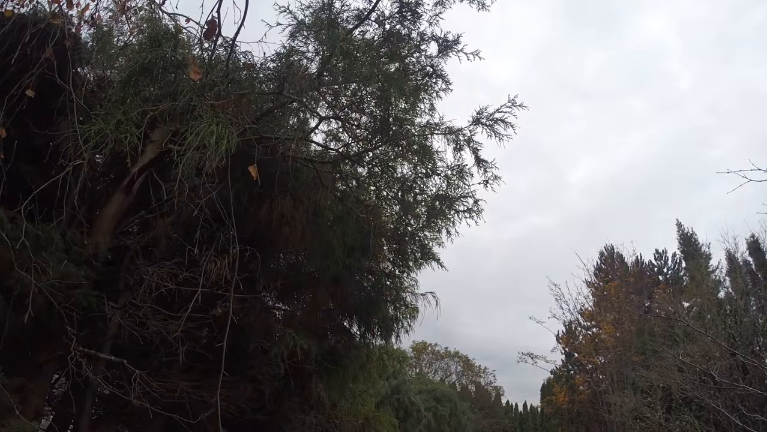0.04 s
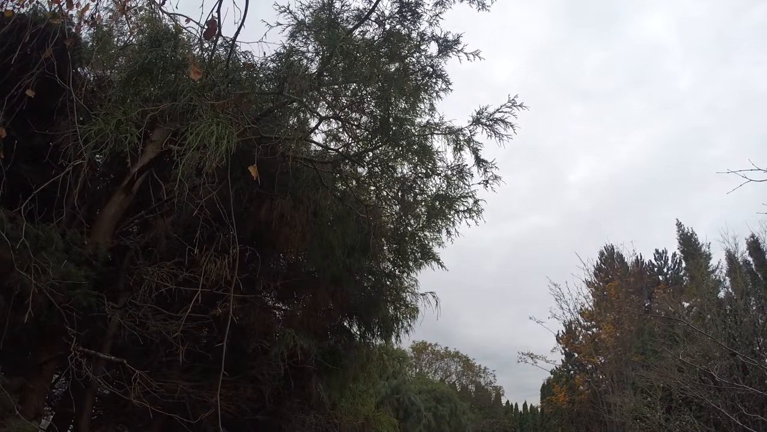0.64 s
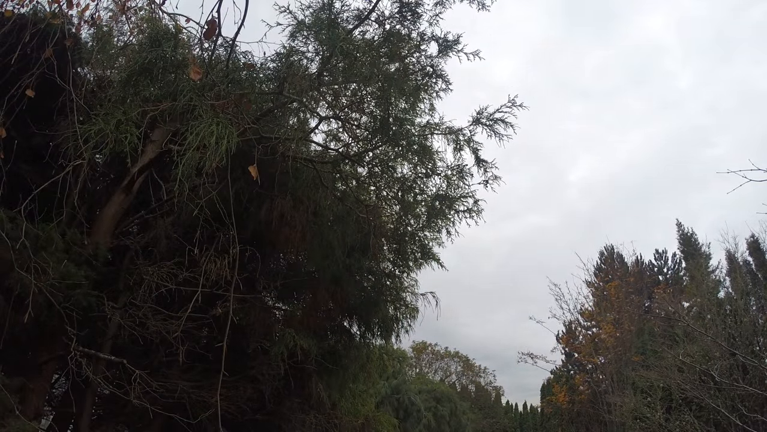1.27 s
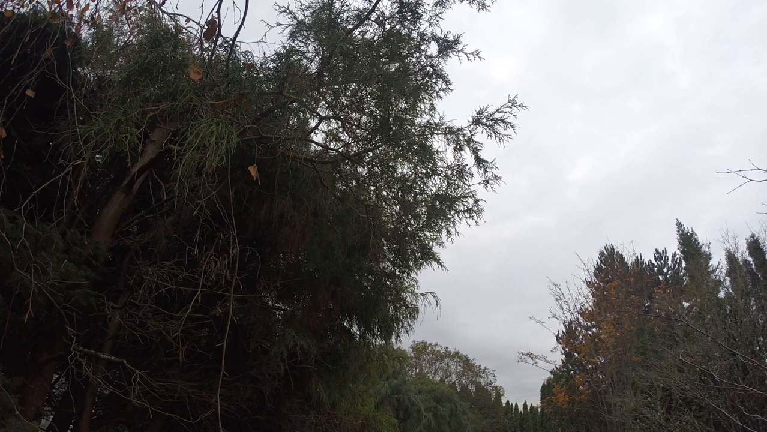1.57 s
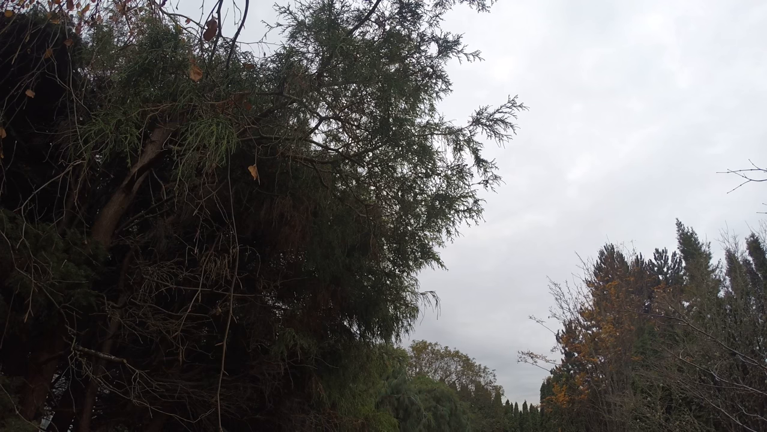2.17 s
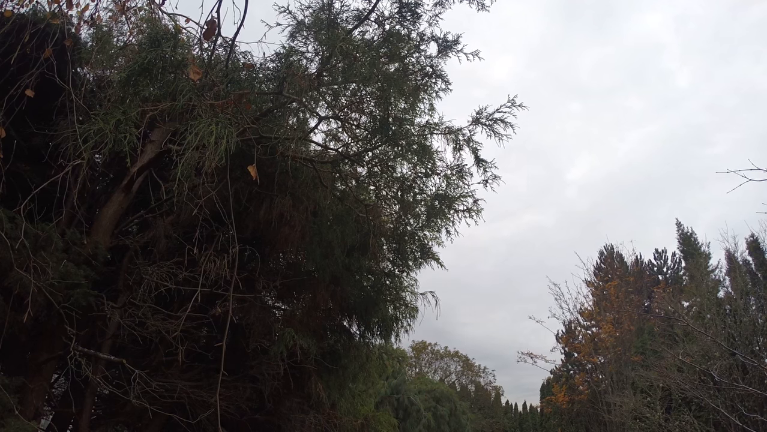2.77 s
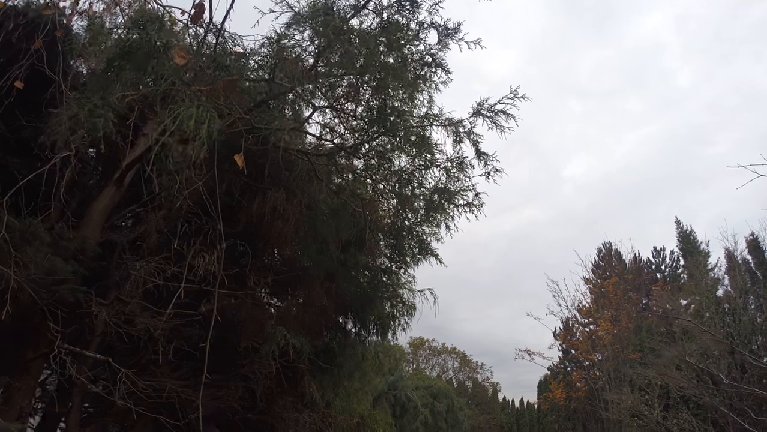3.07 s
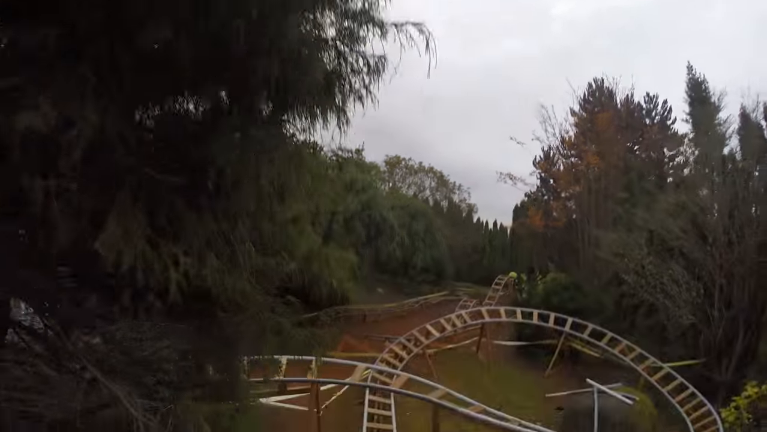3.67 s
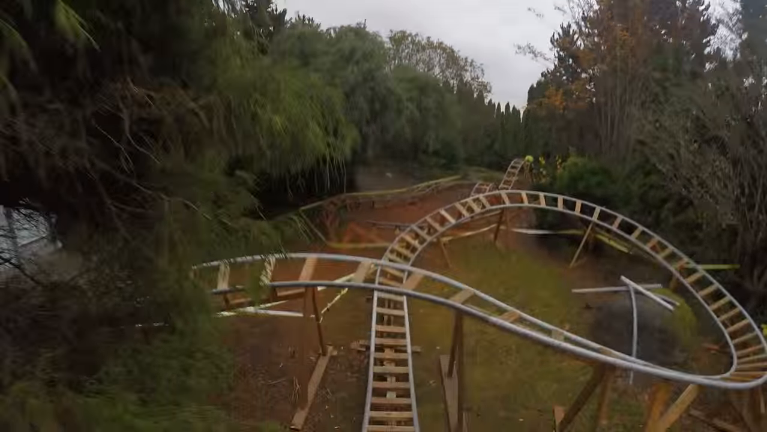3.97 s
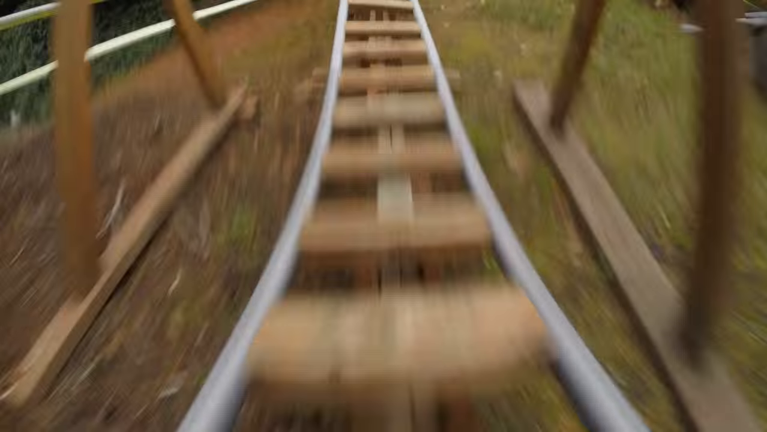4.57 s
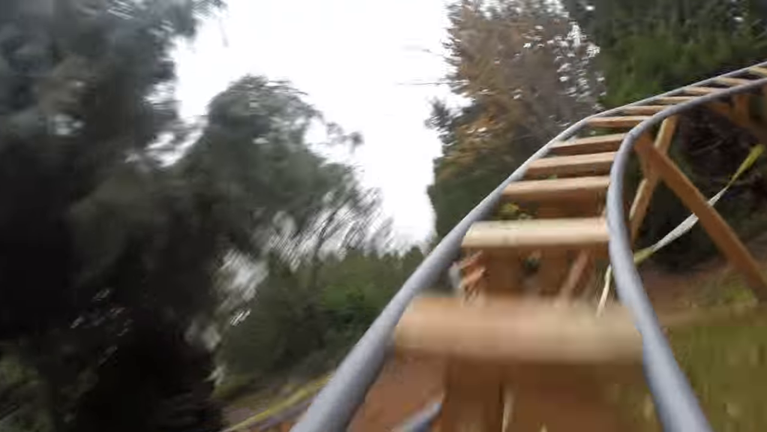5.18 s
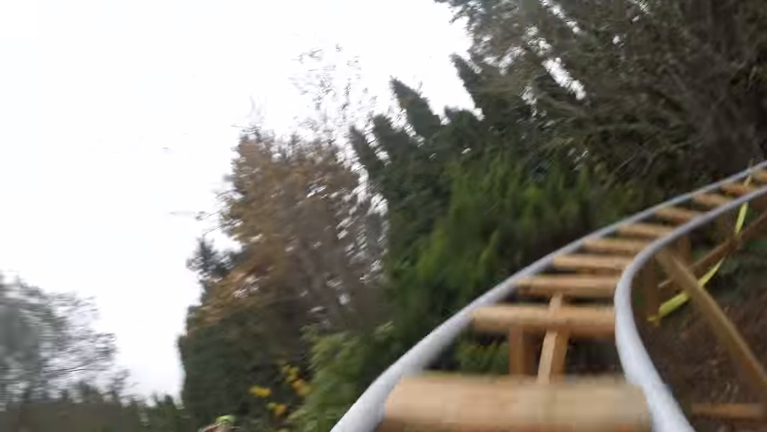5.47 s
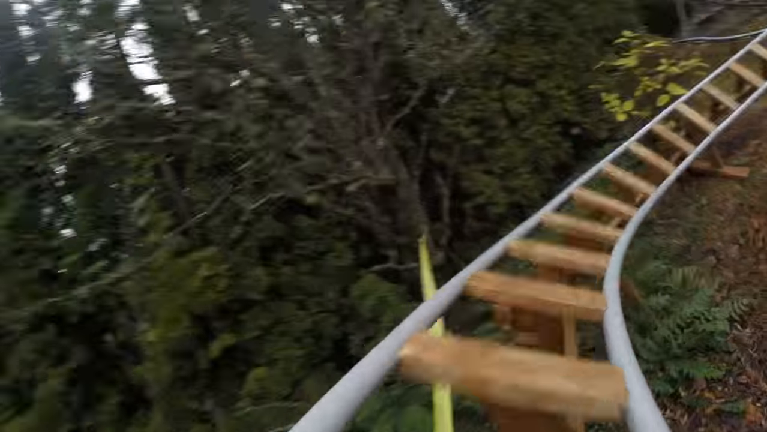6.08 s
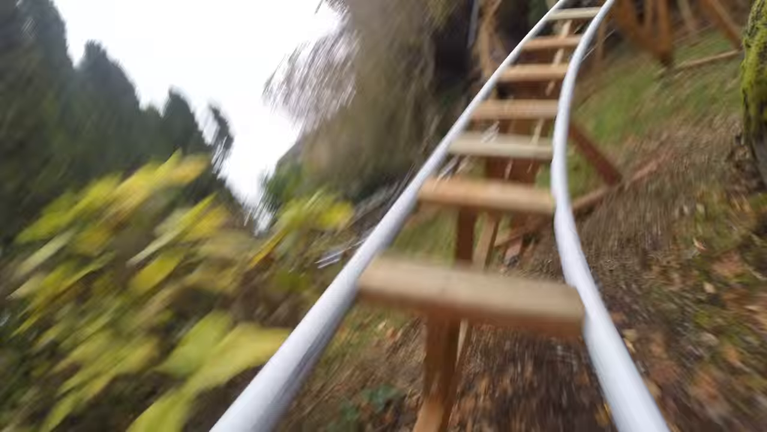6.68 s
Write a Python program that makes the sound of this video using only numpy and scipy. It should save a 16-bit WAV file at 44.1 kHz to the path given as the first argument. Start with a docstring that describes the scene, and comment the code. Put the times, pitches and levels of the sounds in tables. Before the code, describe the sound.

Outdoors in a garden, a faint distant rumble and a soft rustle are heard while a small coaster car waits. The car gives several hollow knocks, creeps forward, then runs downhill. Its hard wheels grind loudly on steel rails over wooden ties, with booming, rattling and sharp clacks from loose joints. The rolling swells and drops as the car rocks, all close to an on-board microphone.

```python
"""A garden coaster track, heard from a small car: it knocks at the top, creeps off, runs downhill.
Hard wheels grind on steel tube rails over wooden ties; the flaws they strike keep the steel ringing.
The frame booms, jolts and clacks in its loose joints. The car rocks, so the rolling swells and drops.
The moving car rumbles deeply; in the dip the wheels groan and two low gusts pass.
A distant rumble lies under it all. The on-board camera's limiter catches the loudest clacks."""
import sys
import numpy as np
from scipy import signal
from scipy.fft import rfft, irfft, next_fast_len
from scipy.io import wavfile
from scipy.ndimage import uniform_filter1d, map_coordinates

SR = 44100
rng = np.random.default_rng(int(sys.argv[2]) if len(sys.argv) > 2 else 0)


def unload_audio(sound):
    """Save the sound as a 16-bit wav file, at the path given as the first command line argument."""
    columns = np.transpose(np.atleast_2d(sound))
    # keep every value between -1 and 1, then stretch to whole-number steps
    steps = np.round(np.clip(columns, -1, 1) * 32767)
    wavfile.write(sys.argv[1], SR, steps.astype(np.int16))


N = 301644

# Noise spectra: freq_hz, density_db
GARDEN_SPECTRUM = [(12, -44), (20, -8.5), (92, 0), (149, -10), (242, -8), (532, -18.5), (718, -14),
                   (1440, -26.5), (1940, -30.5), (2130, -32.5), (3450, -35), (5000, -42.5), (6500, -63),
                   (11000, -120)]  # distant rumble
HISS_SPECTRUM = [(500, -25), (3000, 0), (6000, 3), (9000, -4), (14000, -4.5), (15500, -3)]  # camera electronics
CLATTER_SPECTRUM = [(88, -15), (150, -7), (239, -19), (462, -4), (595, -5), (1290, -1.5), (1420, -12),
                    (1600, 2.5), (2810, -5.5), (4220, -7.5), (5030, -5.5), (6110, -10.5), (6730, -22.5),
                    (13500, -36.5), (15500, -66)]  # chattering parts
RUSTLE_SPECTRUM = [(60, -11), (200, 3), (450, -3), (1200, -10), (2000, -17), (3800, -25), (6000, -21),
                   (9000, -30), (15000, -40)]  # soft rustle
WHISPER_SPECTRUM = [(100, 6.5), (350, 5.5), (800, 7), (1400, 0), (2000, -2), (4200, -10.5), (6000, -3.5),
                    (9000, -11), (13000, -18), (15500, -16)]  # creeping wheels
CAR_RUMBLE_SPECTRUM = [(15, 3.5), (35, -6), (75, -6), (130, -19), (400, -81), (2000, -94)]  # deep rumble of the moving car, low gusts
ROAR_SPECTRUM = [(60, -11.5), (170, -7.5), (270, -7), (450, 2), (750, -0.5), (1100, -4.5), (1700, -7.5),
                 (3000, -25.5), (6000, -29), (15000, -102.5)]  # rolling, dull part
GRIT_SPECTRUM = [(300, -6.5), (1000, -14), (1900, 11), (2700, 0.5), (4100, -6.5), (5100, -2.5),
                 (6200, -9.5), (7800, -21), (10000, -44), (15500, -58)]  # rolling, bright part
FIZZ_SPECTRUM = [(2000, -29), (6000, 12.5), (9000, -8.5), (13300, -1), (15500, -11)]  # hard-pressed wheels
CRACK_SPECTRUM = [(150, -17), (700, 9), (3000, 11), (6000, -1), (8000, -14.5), (11000, -17), (15500, -47)]  # joint impact
GROAN_SPECTRUM = [(200, -26.5), (400, -5), (520, -10.5), (700, -2), (1100, -0.5), (1500, -10),
                  (3000, -28.5), (8000, -70)]  # wheels in the dip

# Blows on the car: start_s, level_db, thump_db, treble_db, clatter_t60_s, low_mid_db, hollow_hz
KNOCK_HITS = [(0.198, -37.5, -13, -33, 0.03, 11, 1010), (1.586, -31.5, -14, -25, 0.06, 3, 1090),
              (2.104, -30, -15, -17, 0.06, 4, 3450), (2.153, 2, -23, -11, 0.065, -7, 1130),
              (2.213, -20.5, -17, -16, 0.088, -9, 3330), (2.378, 5.5, -19.5, -9.5, 0.088, 3, 925),
              (2.394, 3, -26, -9, 0.056, 6.5, 2320), (2.67, -9.5, -12, -14.5, 0.073, 11, 690),
              (2.951, -21, -11.5, -49, 0.065, 7, 1840), (3.211, 7.5, -24, -9, 0.071, 8, 453),
              (3.225, 1, -18, -2, 0.087, -17, 2700)]
# Frame modes, the second its bounce on the wheels: freq_hz, level_db, t60_s
FRAME_MODES = [(28.1, -13, 1.655), (118.5, -2.5, 0.24), (490, -5.5, 0.23), (956, -12, 0.13),
               (1900, -11, 0.17), (4500, -29, 0.21)]
# Chassis resonances: freq_hz, width_hz, lift_db
CHASSIS_RESONANCES = [(464, 52, -1.5), (674, 66, 6.5), (950, 250, 2), (1310, 23, -1.5), (1890, 160, -1),
                      (2813, 420, 6), (3538, 370, 6.5), (4923, 66, 10.5), (6100, 490, 5.5), (7370, 340, 11)]
# Slow creep of the wheels: time_s, level_db
CREEP_LEVELS = [(0, -88), (2.0, -83), (2.45, -52.5), (2.86, -45), (2.97, -47.5), (3.06, -44.5), (3.2, -41),
                (3.3, -55), (3.4, -71)]
# Short gritty scrapes, and the soft first contact of the 3.21 s knock:
# centre_s, level_db, half_length_s, centre_hz
SCRAPES_AND_CONTACT = [(2.324, -33.5, 0.037, 1890), (2.641, -32.5, 0.017, 1010), (2.67, -29.5, 0.016, 1290),
                       (3.209, -14, 0.0023, 607), (3.249, -21.5, 0.02, 2530), (3.37, -45, 0.061, 1775)]
# Frame bounce over the crest: time_s, level_db
CREST_LEVELS = [(2.8, -51.5), (3.08, -37.5), (3.37, -28.5), (3.44, -17), (3.69, -19), (3.77, -26.5),
                (4.2, -33), (4.6, -49)]
# Low gusts at the bottom of the dip: centre_s, level_db
DIP_GUSTS = [(4.809, -23), (5.04, -29)]
# Rolling, growing with speed and load: time_s, roar_db, grit_db
ROLL_LEVELS = [(3.3, -38, -76), (3.39, -36.5, -57), (3.44, -27.5, -23), (3.56, -24.5, -23.5),
               (3.66, -19.5, -18), (3.85, -24, -30), (4.2, -27, -32), (4.5, -28, -24), (4.8, -21, -23.5),
               (5.05, -25.5, -20), (5.38, -22.5, -25.5), (5.78, -29.5, -28), (5.95, -24.5, -23),
               (6.2, -26.5, -27.5), (6.58, -23, -23.5), (6.84, -26, -31.5)]
# Rocking; the wheels press, lift, run light: lift_s, drop_db, light_for_s
WHEEL_LIFTS = [(3.743, 6, 0.069), (4.035, 4.5, 0.052), (4.314, 6.5, 0.051), (4.525, 0, 0.076),
               (4.954, 0.5, 0.023), (5.12, 4.5, 0.14), (5.579, 3, 0.086), (5.69, -2, 0.021),
               (6.295, 2.5, 0.025), (6.697, 8.5, 0.036)]
# Modes of wheels and steel tube: freq_hz, width_hz, level_db
STEEL_MODES = [(601, 15, 3), (1627, 10, -26), (2300, 17, 3), (2384, 67, 7.5), (2836, 98, 5),
               (4860, 200, 6.5), (5034, 62, 1.5), (5960, 53, -4), (7330, 40, -16), (8690, 35, -14),
               (10300, 37, -14.5), (11750, 75, -17), (13250, 160, -25)]
# Wheels hitting uneven rail: start_s, level_db, treble_db, clatter_t60_s
RAIL_JOLTS = [(3.621, -5.5, -5, .06), (3.7, -5, -4, .035), (3.831, -9.5, -5, .025),
              (3.857, -12.5, 6, 0.096), (4.002, 1, -3, 0.076), (4.085, -6, 5, .045), (4.127, -8, 11, 0.042),
              (4.362, -9.5, -6, 0.074), (4.421, 2, 0, 0.07), (4.448, -1, -12, 0.035),
              (4.494, 2.5, -13, 0.072), (4.644, -4, -2.5, 0.077), (4.71, -6, -11, 0.05),
              (4.797, 0.5, -17, 0.02), (4.912, -1.5, -3, 0.07), (4.939, -1.5, 12, 0.043),
              (4.998, -7, -11, 0.049), (5.039, -8.5, -4, 0.037), (5.082, -5, -4, .15),
              (5.376, -4.5, 1, .027), (5.659, -6.5, 0, .067), (5.767, -8, -2, 0.033),
              (5.967, -5.5, 5, 0.073)]
# A loose joint striking its stop: start_s, clack_db, ping_db
JOINT_HITS = [(4.4721, 13, 2), (4.514, 13, 3.5), (4.527, 7, -14), (4.559, 9, 0), (4.573, 4.5, -9),
              (4.587, 1, -22), (4.606, 9, -7), (4.6963, 2.5, -25), (5.114, -9, 2), (5.1164, 7, 9),
              (5.2006, 13.5, 4), (5.212, -5, 2.5), (5.3183, 8.5, -4.5), (5.353, 0, 7.5), (5.463, -1.5, -23),
              (5.5736, 15.5, 2), (5.6816, 1, 12), (5.8747, -8, 2), (5.8884, 1.5, -1), (6.0389, 9.5, 6.5),
              (6.0978, 1, 9.5), (6.2103, -22, -3.5), (6.249, -18, 8.5), (6.254, -18, 5), (6.2865, -24, 5),
              (6.4143, -7, -5.5), (6.4314, 3.5, -3), (6.465, -14, -4.5), (6.474, -19, -6),
              (6.4922, -21, 2.5), (6.508, -18, 2), (6.5132, -18, -3.5), (6.5321, -6, -0.5),
              (6.5408, -9, -2), (6.5742, 7, -27), (6.6473, -2.5, -4), (6.677, -12, 11), (6.6845, -20, 7),
              (6.6875, -14, 11.5), (6.7327, 1.5, -5.5)]
# Resonances of the groan: freq_hz, width_hz, lift_db
GROAN_RESONANCES = [(704, 80, 7), (953, 110, 6)]

CRUISE_DB = -22.5  # roar and grit at cruising load
TIME_S = np.arange(N) / SR


def amp(db):
    """Decibels to gain."""
    return 10 ** (np.asarray(db) / 20)


def unit(x):
    """x at rms 1."""
    return x / np.sqrt(np.mean(x ** 2) + 1e-20)


def noise(count=N):
    """White noise."""
    return rng.standard_normal(count)


def impulses(rate_hz):
    """Randomly timed impulses of random size."""
    return (rng.random(N) < rate_hz / SR) * noise()


def along(points, hz):
    """Interpolate (freq_hz, value) points on a log axis."""
    freqs_hz, values = np.transpose(points)
    return np.interp(np.log(hz + 1), np.log(freqs_hz + 1), values)


def levels(rows):
    """A gain curve per dB column, fading in over 81 ms before the first row."""
    times_s, *columns_db = np.transpose(rows)
    fade_in = np.clip(1 + (TIME_S - times_s[0]) / 0.081, 0, 1)
    return [amp(np.interp(TIME_S, times_s, db)) * fade_in for db in columns_db]


def swell(full_s, rise_s, hold_s, fall_s):
    """Trapezoid, 0 to 1 and back; reaches 1 at full_s."""
    t = TIME_S - full_s
    return np.clip(np.minimum(1 + t / rise_s, 1 - (t - hold_s) / fall_s), 0, 1)


def wobble(rate_hz):
    """Smooth random curve, rms near 1."""
    return map_coordinates(noise(int(N * rate_hz / SR) + 4), [TIME_S * rate_hz])


def colour(x, spectrum, resonances=(), size=8192):
    """Minimum-phase filter of energy 1: a smooth spectrum plus resonant peaks."""
    hz = np.fft.rfftfreq(size, 1 / SR)
    peaks_db = sum(db / (1 + (2 * (hz - peak_hz) / width_hz) ** 2)
                   for peak_hz, width_hz, db in resonances)
    cepstrum = irfft(np.log(amp(along(spectrum, hz) + peaks_db)))
    cepstrum[1:size // 2] *= 2
    cepstrum[size // 2 + 1:] = 0
    response = irfft(np.exp(rfft(cepstrum)))
    return signal.fftconvolve(x, response / np.linalg.norm(response))[:len(x)]


def patchy_noise(depth_db, size):
    """Noise with random time-frequency gain patches; larger size: longer, narrower patches."""
    bins = signal.stft(noise(), nperseg=size)[2]
    patches = uniform_filter1d(noise(bins.shape), size=6, axis=0)
    patches = unit(uniform_filter1d(patches, size=5, axis=1))
    return unit(signal.istft(bins * amp(depth_db * patches), nperseg=size)[1][:N])


def ring(t, hz, t60_s):
    """One damped mode."""
    return np.sin(2 * np.pi * hz * t) * amp(-60 * t / t60_s)


def add(track, start_s, sound):
    """Mix a sound in at start_s."""
    part = track[round(start_s * SR):][:len(sound)]
    part += sound[:len(part)]


def garden():
    """Steady distant rumble."""
    return amp(-47.5) * unit(colour(noise(), GARDEN_SPECTRUM))


def electronics():
    """The camera's faint hiss with a thin whine."""
    return amp(-68) * unit(colour(noise(), HISS_SPECTRUM, resonances=[(11270, 250, 14)]))


def rustle():
    """One soft rustle while the car waits."""
    flutter = amp(2.1 * wobble(30.6))
    brushing = colour(noise(), RUSTLE_SPECTRUM, resonances=[(260, 120, 5), (2050, 350, 5.8)])
    return amp(-46) * swell(0.39, rise_s=0.28, hold_s=0, fall_s=0.12) * unit(flutter * brushing)


def clatter(t, t60_s, treble_db, low_db, hold_s, rise_s, resonances=CHASSIS_RESONANCES):
    """Parts chatter against each other for a few ms, then die away."""
    tilt = [(500, low_db), (1000, 0), (2500, 0), (5000, treble_db)]
    spectrum = [(hz, db + along(tilt, hz)) for hz, db in CLATTER_SPECTRUM]
    envelope = (1 - np.exp(-t / rise_s)) * amp(-60 * np.maximum(t - hold_s, 0) / t60_s)
    return colour(envelope * noise(len(t)), spectrum, resonances)


def knocks():
    """Eased over the top, the car bumps the track; each blow rings the frame."""
    out, t = np.zeros(N), np.arange(SR) / SR
    for start_s, db, thump_db, treble_db, t60_s, low_db, hollow_hz in KNOCK_HITS:
        frame = sum(amp(mode_db + rng.normal(0, 1)) * ring(t, hz, mode_t60_s)
                    for hz, mode_db, mode_t60_s in FRAME_MODES)
        add(out, start_s, amp(db + thump_db) * frame * (1 - np.exp(-t / 0.0034)))
        hollow = [*CHASSIS_RESONANCES, (hollow_hz, 0.16 * hollow_hz, 8)]  # struck spot adds a peak
        parts = clatter(t, t60_s, treble_db + 9, low_db, hold_s=0.0025, rise_s=0.0011, resonances=hollow)
        add(out, start_s, amp(db - 9) * parts)
    return out


def creeping():
    """Slow wheels whisper along the rail; short gritty scrapes and one knock's soft first contact."""
    gain, = levels(CREEP_LEVELS)
    flutter = amp(1.5 * wobble(12))
    whisper = colour(noise(), WHISPER_SPECTRUM, resonances=[(1950, 99, 11.5), (3410, 250, 11.3)])
    out = gain * unit(flutter * whisper)
    for centre_s, db, half_s, hz in SCRAPES_AND_CONTACT:
        band = [(hz / 6, -22), (hz / 2, -4), (hz, 0), (hz * 2, -10), (hz * 3.6, -22), (hz * 12, -62)]
        grains = unit(colour(impulses(rate_hz=9000), band, CHASSIS_RESONANCES))
        out += amp(db) * np.exp(-np.abs((TIME_S - centre_s) / half_s) ** 3) * grains
    return out


def wheel_gains(press_db=3, press_s=0.18, unload_s=0.005, land_s=0.052):
    """Roar and grit gains: the run's slow course times the rocking wheel load."""
    load_db = np.zeros(N)
    for lift_s, drop_db, light_for_s in WHEEL_LIFTS:
        load_db += press_db * swell(lift_s, press_s, 0, unload_s)
        load_db -= drop_db * swell(lift_s + unload_s, unload_s, light_for_s, land_s)
    return [gain * amp(load_db) for gain in levels(ROLL_LEVELS)]


def boom():
    """The crest and the bumps keep the frame bouncing on its wheels."""
    crest, = levels(CREST_LEVELS)
    roar, _ = wheel_gains()
    gain = np.hypot(crest, amp(-9.5) * roar)
    spectrum = [(20, -40), (75, -29), (100, -7.5), (122, 1), (145, -10), (200, -25.5), (600, -56)]
    swing = unit(colour(noise(), spectrum, resonances=[(118, 50, 3.1)]))
    running_rms = np.sqrt(np.abs(uniform_filter1d(swing ** 2, size=3000)))
    return gain * swing / (running_rms + 0.038)  # stiff wheels keep the swing even


def car_rumble(gust_half_s=0.04):
    """Deep rumble of the moving car, growing with the roar, plus two low gusts."""
    roar, _ = wheel_gains()
    moving = swell(3.2, rise_s=0.15, hold_s=N / SR, fall_s=1)
    rumble_gain = amp(-43) * moving * (1 + roar / amp(CRUISE_DB)) ** 0.3
    gusts = sum(amp(db) * np.exp(-((TIME_S - centre_s) / gust_half_s) ** 2)
                for centre_s, db in DIP_GUSTS)
    return (rumble_gain + gusts) * unit(amp(1.2 * wobble(12)) * colour(noise(), CAR_RUMBLE_SPECTRUM))


def rolling():
    """Wheels strike countless small flaws under a fluttering load; the chassis rings with them."""
    roar, grit = wheel_gains()
    load = amp(2.27 * wobble(90) + 0.74 * wobble(30))
    flaws = unit(impulses(rate_hz=600))
    bright = unit(load * colour(patchy_noise(depth_db=4, size=256), GRIT_SPECTRUM, CHASSIS_RESONANCES))
    dull = unit(load * colour(patchy_noise(depth_db=2, size=768), ROAR_SPECTRUM, CHASSIS_RESONANCES))
    grinding = grit * (amp(-2.5) * bright + amp(-3.5) * rattling())
    fizz_gain = amp(-7.5) * grit ** 1.57  # only hard-pressed wheels hiss
    fizz = fizz_gain * unit(load * colour(noise(), FIZZ_SPECTRUM))
    return amp(-0.85) * roar * dull + grinding + fizz + singing(load * flaws, grit)


def rattling(rate_hz=520, spread_db=12.5, low_hz=650, high_hz=5300):
    """Small parts tick through the chassis, each at its own pitch."""
    t = np.arange(SR // 50) / SR
    when, pitch, size = rng.random((int(rate_hz * N / SR), 3, 1)).transpose(1, 0, 2)
    hz = low_hz * (high_hz / low_hz) ** pitch
    ticks = amp(spread_db * size ** 3) * ring(t, hz, t60_s=0.0092) * (1 - np.exp(-t / 0.00039))
    indices = (when * N).astype(int) + np.arange(len(t))
    rattle = np.bincount(indices.ravel(), ticks.ravel(), N)[:N]
    spectrum = [(700, -1), (2200, 0.5), (3900, -3), (5000, -8), (7000, -12)]
    return unit(colour(rattle, spectrum, CHASSIS_RESONANCES))


def singing(flaws, grit):
    """Flaws ring the steel, most on the straight descent; modes flutter as the contact wanders."""
    descent = swell(4.18, rise_s=0.37, hold_s=0.46, fall_s=0.37)
    gain = amp(-30 + 7.5 * descent) * np.sqrt(grit / amp(CRUISE_DB))
    out, t = np.zeros(N), np.arange(SR // 6) / SR
    for hz, width_hz, db in STEEL_MODES:
        response = np.sin(2 * np.pi * hz * t) * np.exp(-np.pi * width_hz * t)
        mode = signal.fftconvolve(flaws, response)[:N]
        out += amp(db) * unit(mode * amp(3.5 * wobble(45)))
    return gain * unit(out)


def jolts():
    """Rail bumps shake the loose parts and push the frame into its bounce."""
    out, t = np.zeros(N), np.arange(SR // 4) / SR
    bounce_hz, _, bounce_t60_s = FRAME_MODES[1]
    for start_s, db, treble_db, t60_s in RAIL_JOLTS:
        parts = clatter(t, t60_s, treble_db, low_db=3, hold_s=0.0016, rise_s=0.00025)
        add(out, start_s, amp(db - 9.5) * parts + amp(db - 23) * ring(t, bounce_hz, bounce_t60_s))
    return out


def clacks(dip_hz=1364, bend_hz=2036, bend_s=4.9):
    """A loose joint by the microphone: a tiny crack, a heavily damped mode, two higher pings."""
    out, t = np.zeros(N), np.arange(SR // 20) / SR
    for start_s, clack_db, ping_db in JOINT_HITS:
        hz = dip_hz if start_s < bend_s else bend_hz  # side load in the bend raises the pitch
        hz *= 1 + 0.029 * rng.normal()
        clack = amp(clack_db) * ring(t, hz, t60_s=0.0086 * (hz / 2000) ** 0.38)
        low_ping = ring(t, hz=4900 * (1 + 0.021 * rng.normal()), t60_s=0.0076)
        high_ping = ring(t, hz=5500 * (1 + 0.063 * rng.normal()), t60_s=0.0069)
        ping = amp(ping_db) * (low_ping + 0.79 * high_ping)
        crack_gain = amp(-7.5) * np.hypot(amp(clack_db), amp(ping_db))
        crack = crack_gain * colour(noise(len(t)) * amp(-60 * t / 0.013), CRACK_SPECTRUM)
        add(out, start_s, (clack + ping + crack) * (1 - np.exp(-t / 0.0004)))
    return amp(-1) * out


def groan():
    """Pressed into the dip by the car's weight, the wheels groan, hollow and coarse."""
    voice = unit(amp(2.5 * wobble(60)) * colour(noise(), GROAN_SPECTRUM, GROAN_RESONANCES))
    return amp(-24) * swell(4.7, rise_s=0.12, hold_s=0.17, fall_s=0.12) * voice


def limiter(x, release_s, depth_db):
    """Peaks over full scale cut the gain at once, by depth_db at most; it recovers over release_s."""
    excess_nepers = np.log(np.clip(np.abs(x), 1, amp(depth_db))) + 1e-9
    decay = TIME_S / release_s
    held_nepers = np.exp(np.maximum.accumulate(np.log(excess_nepers) + decay) - decay)
    return x * np.exp(-uniform_filter1d(held_nepers, size=12))


def scene():
    """Mono mix, heard from the car."""
    car = creeping() + rolling() + boom() + knocks() + jolts() + clacks()
    return (car + garden() + rustle() + car_rumble() + groan())[None]


def record(dry):
    """The camera adds hiss, limits and rounds the peaks, dulls and cuts the top octave."""
    clip_level, rolloff_hz, cutoff_hz = 0.93, 13500, 15400
    limited = limiter(dry[0] + electronics(), release_s=0.055, depth_db=5.5)
    rounded = limited / (1 + (limited / clip_level) ** 4) ** (1 / 4)
    size = next_fast_len(N + SR // 4)
    hz = np.fft.rfftfreq(size, 1 / SR)
    lowpass = (hz < cutoff_hz) / np.sqrt(1 + (hz / rolloff_hz) ** 10)
    return irfft(rfft(rounded, size) * lowpass, size)[None, :N]


dry = scene()
out = record(dry)
unload_audio(out)
```